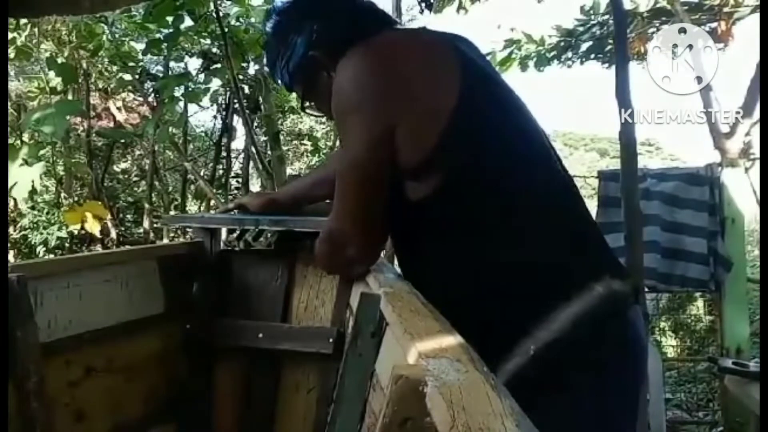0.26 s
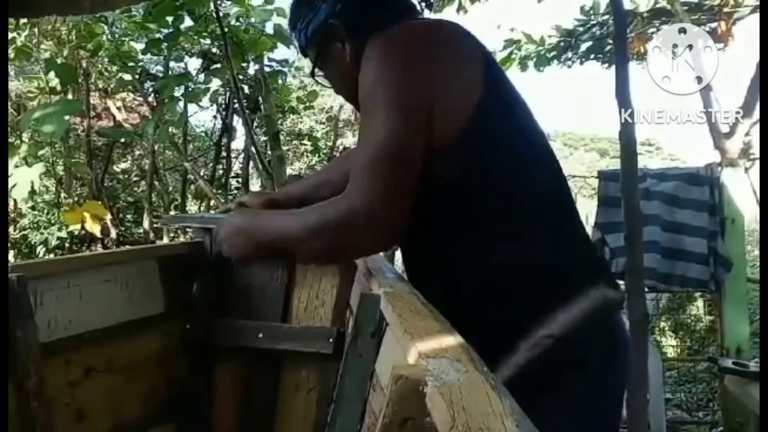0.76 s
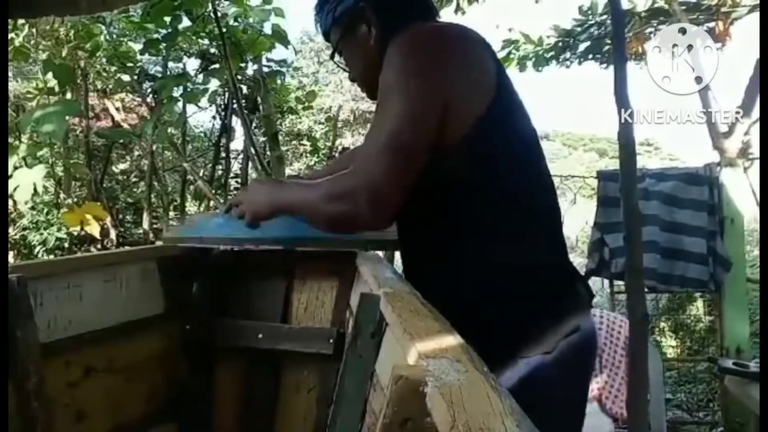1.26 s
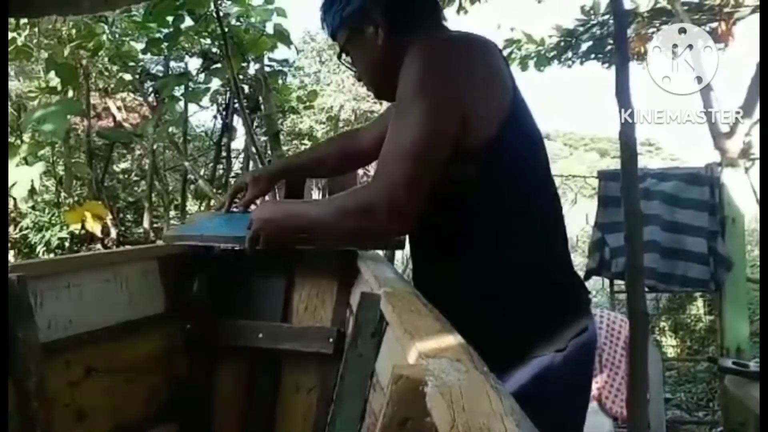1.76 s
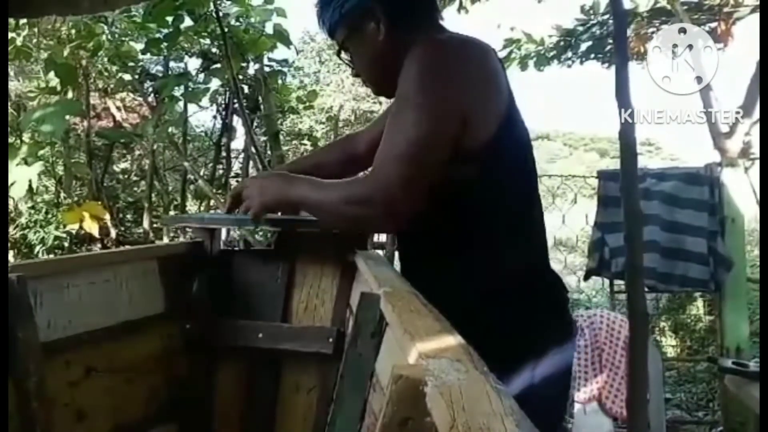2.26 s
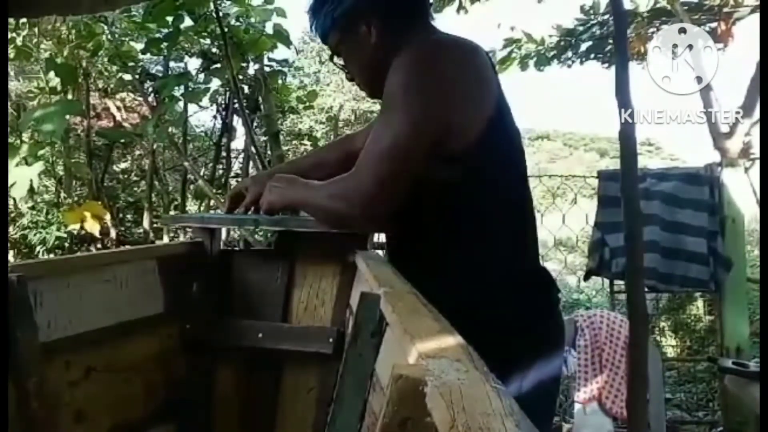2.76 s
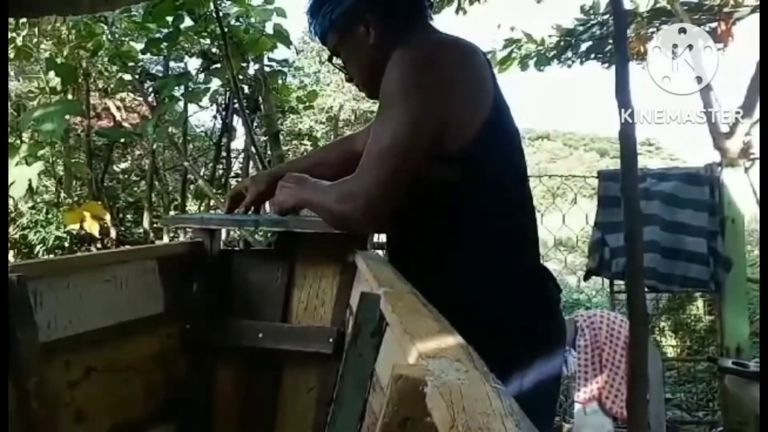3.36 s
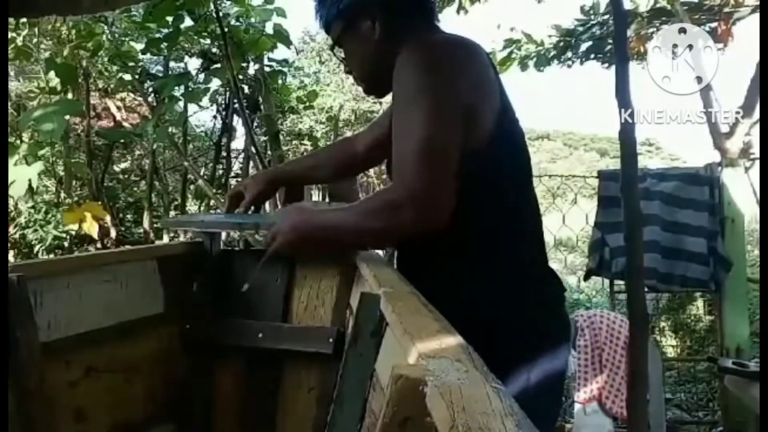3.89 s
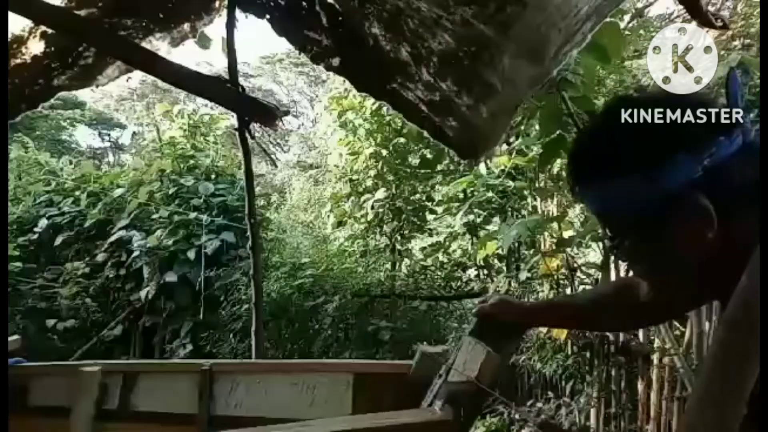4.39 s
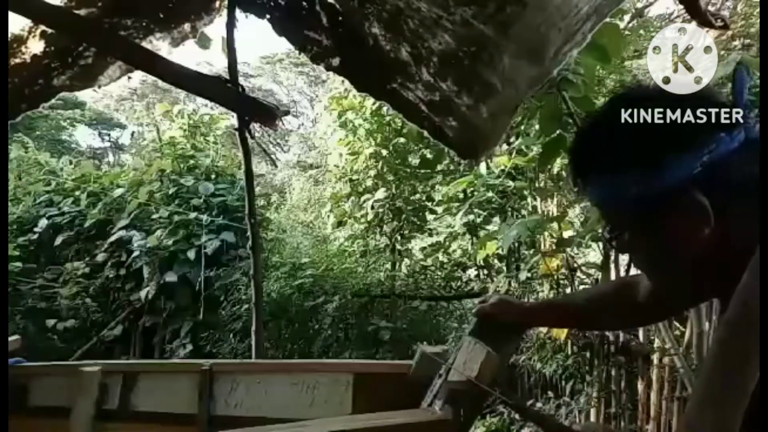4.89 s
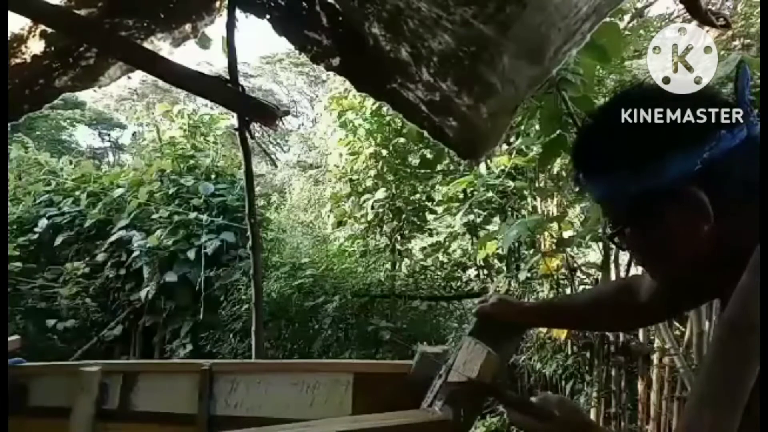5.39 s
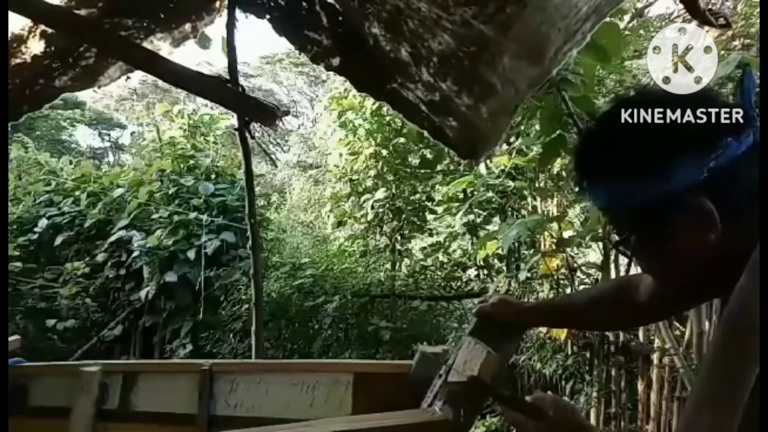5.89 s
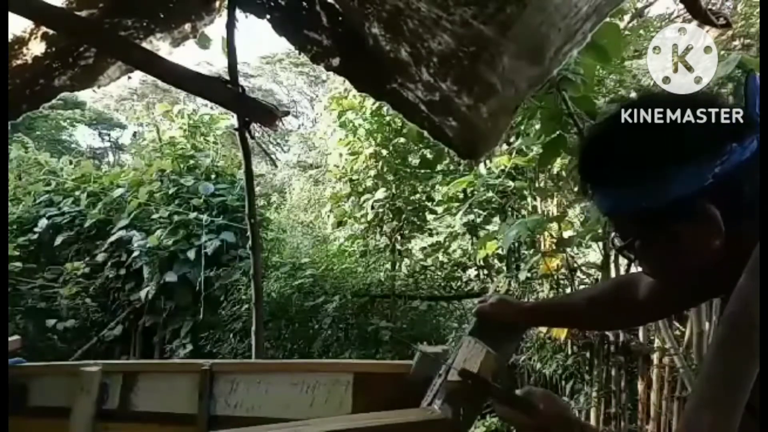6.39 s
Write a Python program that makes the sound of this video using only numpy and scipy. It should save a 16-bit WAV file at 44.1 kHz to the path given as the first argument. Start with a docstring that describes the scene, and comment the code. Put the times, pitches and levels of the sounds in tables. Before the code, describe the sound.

Close, centred handling of wood and steel under an open garden shelter: bright quick rattles, short scrapes, a loud low thump with a small rebound, then uneven knocks ending in two sharper ones. Thin shrill insects, whistling and hoarse birds and a distant rooster surround it. The sound cuts out briefly, then raspy rhythmic hand-sawing runs to the end over fainter insects, the plank shuddering and knocking.

```python
"""A hand saw cuts a plank under a garden shelter: hard push strokes, softer and longer pull strokes.
Each saw tooth bites the kerf as a noise impulse that rings the plank and blade; torn fibres add hiss.
Before a short silence, saw and plank are shifted on a wooden frame: drags, and blows that ring dying modes.
One heavy thump makes the gain control duck. Behind it, insects buzz as bands of noise and a pulsed tone,
birds and a far rooster call in gliding tones, and the open air is a faint wash with a low rumble."""
import sys
import numpy as np
from scipy import signal
from scipy.fft import rfft, irfft, next_fast_len
from scipy.io import wavfile
from scipy.ndimage import uniform_filter1d

SR = 44100
rng = np.random.default_rng(int(sys.argv[2]) if len(sys.argv) > 2 else 0)


def transcribe(u):
    """Save the signal u as a 16-bit wav file named by the first command-line argument.

    u: samples, shape (n,) or (channels, n), limited to [-1, 1]; the rate is SR.
    q: integer samples, one column per channel.
    """
    v = np.clip(np.atleast_2d(u).T, -1, 1)
    q = np.round(v * 32767).astype(np.int16)
    wavfile.write(sys.argv[1], SR, q)


N = 293265
TIME = np.arange(N) / SR  # seconds


def amp(db):
    """Decibels to gain."""
    return 10 ** (np.asarray(db) / 20)


def unit(x):
    """Scales to rms 1."""
    return x / np.sqrt(np.mean(x ** 2) + 1e-20)


def add(mix, start, sound):
    """Mixes a sound in, in place, at start seconds."""
    part = mix[max(round(start * SR), 0):][:len(sound)]
    part += sound[:len(part)]


def progress(length):
    """Runs from 0 to 1 in length seconds."""
    return np.linspace(0, 1, round(length * SR))


def arch(u, crest):
    """Rises from 0 to 1 at the share crest of u, and falls back."""
    crest = np.clip(crest, .05, .95)
    return np.sin(np.pi * np.interp(u, [0, crest, 1], [0, .5, 1]))


def gate(start, stop, rise_s, fall_s):
    """Attack, hold and release over the whole scene, 0-1."""
    return np.clip(np.minimum((TIME - start) / rise_s, (stop - TIME) / fall_s), 0, 1)


def wander(size, hz):
    """Smooth random drift of rms 1 that heads for a new value hz times a second."""
    knots = rng.standard_normal(4096)
    return unit(np.interp(np.arange(size) * hz / SR, np.arange(len(knots)), knots))


def colour(x, points):
    """Filters by a spectrum of (Hz, dB) points that falls 60 dB an octave beyond its ends; rms 1."""
    hz, db = np.transpose(points)
    size = next_fast_len(len(x) + 1024)
    octave = np.log2(np.fft.rfftfreq(size, 1 / SR) + 1)
    beyond = abs(octave - np.clip(octave, np.log2(hz[0]), np.log2(hz[-1])))
    gain = amp(np.interp(octave, np.log2(hz), db) - 60 * beyond)
    return unit(irfft(rfft(x, size) * gain, size)[:len(x)])


def resonate(x, hz, width):
    """A band-pass resonance of gain 1 at its centre, width in Hz."""
    return signal.lfilter(*signal.iirpeak(hz, hz / width, fs=SR), x)


def echoes(x, t60, wet_db):
    """Adds a diffuse tail of reflections that starts after 4 ms and falls 60 dB in t60 seconds."""
    t = TIME[:SR // 2]
    tail = rng.standard_normal(len(t)) * amp(-60 * t / t60) * (t > .004)
    tail /= np.linalg.norm(tail)
    return x + amp(wet_db) * signal.fftconvolve(x, tail)[:len(x)]


# The still garden air. Each row: a point of its spectrum, frequency in Hz, relative level in dB.
AIR_SPECTRUM = [(25, -20.5), (60, 0), (100, 0), (145, -6), (250, -11.5), (400, -16), (760, -15.5),
                (1300, -24.5), (2100, -27), (3200, -27), (6300, -32.5), (11000, -38), (13000, -51)]


def air():
    """Faint outdoor wash of coloured noise, with a low, distant rumble of noise in a narrow band."""
    wash, rumble = rng.standard_normal((2, N))
    wash = colour(wash, AIR_SPECTRUM) * amp(0.41 * wander(N, 4.1))
    rumble = resonate(resonate(rumble, 95.7, 27), 95.7, 27)
    return amp(-43.0) * wash + amp(-42.5) * unit(rumble)


# The short silence. One row: fade begins, silent from, sound returns, length of the fade-in, all in seconds.
SILENCE = (4.072, 4.12, 4.184, .008)
# The far chorus, one kind a row. Each row: centre in Hz, width in Hz, level in dB, mean chirps a second,
# chirp depth 0-1, start of its swell in seconds (below zero: already singing at the opening).
FAR_CHORUS = [(7865, 780, -41, 57, 0.08, -1), (8950, 700, -52, 17, 0.3, -3), (9380, 720, -42.5, 12, 0, -1),
              (9820, 2200, -47, 15, 0.1, -2.5), (10900, 520, -60, 7, .1, -10.5)]
# Bouts of the nearest insect. Each row: start in seconds, stop in seconds, level in dB.
NEAR_BOUTS = [(-1, .07, -44), (.3, 2.07, -45.5), (2.65, 4.0, -45), (4.1, 7, -53)]
SWELL_S, STOP_S = 0.54, 0.028  # a bout swells slowly and stops short
CHORUS_DROP_DB = -7  # the far chorus is fainter after the silence


def far_insects():
    """Each far kind shrills as noise in its own band, pulsed by its chirps; the whole chorus wavers."""
    chorus = np.zeros(N)
    for hz, width, db, rate, depth, start in FAR_CHORUS:
        edges = [hz - width / 2, hz + width / 2]
        band = signal.butter(3, edges, "band", fs=SR, output="sos")
        turns = np.cumsum(rate * (1 + .2 * wander(N, 2.2))) / SR
        chirps = 1 + depth * np.sin(2 * np.pi * turns)
        shrill = unit(chirps * signal.sosfilt(band, rng.standard_normal(N)))
        chorus += amp(db) * np.clip((TIME - start) / SWELL_S, 0, 1) * shrill
    return chorus * amp(CHORUS_DROP_DB * (TIME > SILENCE[1]) + 2.0 * wander(N, 15))


def near_insect():
    """The nearest insect buzzes in bouts: a thin, unsteady tone, pulsed 114 times a second."""
    buzz = 1 + .6 * np.sin(2 * np.pi * 114 * TIME)
    tone = np.sin(2 * np.pi * np.cumsum(11180 + 70 * wander(N, 500)) / SR)
    bouts = sum(amp(db) * gate(start, stop, SWELL_S, STOP_S) for start, stop, db in NEAR_BOUTS)
    return bouts * unit(echoes(buzz * tone, t60=.15, wet_db=-11))


def call(hz, loudness, rough, partials_db):
    """A gliding harmonic tone; fast random flutter of its pitch makes it hoarse."""
    turns = np.cumsum(hz * (1 + rough * wander(len(hz), 900))) / SR
    partials = [amp(db) * np.sin(2 * np.pi * k * turns) for k, db in enumerate(partials_db, 1)]
    return loudness * unit(sum(partials))


# Falling whistles. Each row: start in seconds, length in seconds, first Hz, last Hz, relative level in dB.
WHISTLE_CALLS = [(0, 0.15, 4720, 4420, -42.5), (0.263, .36, 4150, 3630, -44), (0.721, .6, 4100, 2790, -48),
                 (3.334, 0.15, 3880, 3770, -55), (3.69, 0.1, 3050, 2840, -51.5)]
SETTLE, WHISTLE_CREST = 1.8, 0.53  # how quickly the fall levels off; share of the length at its loudest


def whistles(out):
    """Adds nearly pure tones whose fall in pitch levels off."""
    for start, length, first_hz, last_hz, db in WHISTLE_CALLS:
        u = progress(length)
        hz = first_hz + (last_hz - first_hz) * np.expm1(-SETTLE * u) / np.expm1(-SETTLE)
        add(out, start, call(hz, amp(db) * arch(u, WHISTLE_CREST), rough=0.022, partials_db=[0]))


# Hoarse chirps. Each row: start in seconds, length in seconds, top Hz before the trill, relative level in dB,
# share of the length at which it is loudest.
CHIRP_CALLS = [(0.44, 0.063, 2720, -35.5, .4), (1.58, 0.075, 2420, -34, 0.34),
               (2.155, 0.076, 3000, -37.5, 0.69), (2.349, 0.1, 3150, -33.5, 0.93)]
CHIRP_TURN, CHIRP_FALL = .22, .26  # share of the length at the top pitch; share of pitch lost per length
TRILL_HZ, TRILL_DEPTH = 270, .07  # depth as a share of the pitch


def chirps(out):
    """Adds tones that rise and fall in pitch under a fast trill."""
    for start, length, top_hz, db, crest in CHIRP_CALLS:
        u = progress(length)
        trill = 1 + TRILL_DEPTH * np.sin(2 * np.pi * TRILL_HZ * length * u)
        hz = top_hz * (1 - CHIRP_FALL * abs(u - CHIRP_TURN)) * trill
        add(out, start, call(hz, amp(db) * arch(u, crest), rough=0.05, partials_db=[0, -25]))


def rooster(out):
    """Adds one far crow: its pitch starts low, scoops up quickly, then sags."""
    start_s, length_s, crest = 2.9, .46, .22
    full_hz, level_db = 717, -43
    scoop, scoop_s, sag = .28, .02, 0.17  # shares of the pitch, and the time of the scoop
    u = progress(length_s)
    hz = full_hz * (1 - scoop * np.exp(-u * length_s / scoop_s) - sag * u)
    add(out, start_s, call(hz, amp(level_db) * arch(u, crest), rough=0.062, partials_db=[-3, 0, -3]))


def birds():
    """Birds in the bushes; leaves scatter the calls and make them fade in and out."""
    calls = np.zeros(N)
    whistles(calls)
    chirps(calls)
    rooster(calls)
    return amp(-3.0) * echoes(calls * amp(1.6 * wander(N, 45)), t60=.22, wet_db=-9)


# Light drags of the saw over the wood. Each row: start in seconds, length in seconds, level in dB.
DRAGS = [(-.02, 0.3, -40), (0.382, 0.13, -44.5), (0.768, 0.086, -48), (0.885, 0.12, -40.5),
         (1.234, 0.15, -42.5)]


def slide():
    """Steel drags lightly over dry wood: coloured noise of uneven grit."""
    grit = rng.standard_normal(N) * amp(3.0 * wander(N, 150))
    drags = sum(amp(db) * gate(start, start + length, rise_s=0.014, fall_s=0.04)
                for start, length, db in DRAGS)
    return drags * colour(grit, [(250, 6.0), (700, -1.0), (1700, -2.5), (2400, -5.5), (4700, -8),
                                 (7000, -10), (12500, -11.5)])


def ring(modes, t):
    """Dying modes; each blow lands on a slightly different spot, so tuning, level and sign vary."""
    hz, db, t60 = np.transpose(modes)[:, :, None]
    detune, spot, side = rng.standard_normal((3, len(modes), 1))
    swing = np.sign(side) * np.sin(2 * np.pi * hz * (1 + 0.0092 * detune) * t)
    return (amp(db + spot - 60 * t / t60) * swing).sum(0) / np.linalg.norm(amp(db))


# Low modes of the wooden frame. Each row: frequency in Hz, relative level in dB, t60 in seconds.
FRAME_MODES = [(78.2, -15, 0.55), (92.1, -6.5, 0.6), (111.6, 1, 0.34), (127.3, 2.5, 0.34),
               (160, -3.5, 0.21), (242, 1, 0.17), (309.6, -5, 0.11), (376, -1.5, 0.069)]
# Diffuse shudder of the whole frame. Each row: frequency in Hz, relative level in dB.
FRAME_SHUDDER = [(75, 5), (125, 2.5), (200, -6), (420, -9.5), (520, -21)]
# Spectrum of a blow's dull clatter. Each row: frequency in Hz, relative level in dB.
CLATTER_SPECTRUM = [(30, -24), (200, 6), (600, 5.5), (1000, -1), (1800, -2.5), (2400, -13.5), (4500, -20.5),
                    (8000, -42)]
# Spectrum of a blow's click. Each row: frequency in Hz, relative level in dB.
CLICK_SPECTRUM = [(1000, -30), (2800, -2), (5000, -5), (7000, -8.5), (10000, 1.5), (13000, -10)]


def blows(rows, modes, ring_db, clatter_db, bright_hz, size):
    """A brief scuffing contact rings the struck thing and the frame beneath it."""
    out, t = np.zeros(N), TIME[:size]
    softness = signal.butter(4, min(bright_hz, SR / 3), fs=SR, output="sos")
    clatter_tail, click_tail = amp(-19 - 60 * t / .2), amp(-19 - 60 * t / .1)
    for start, db, boom_db, click_db, contact in rows:
        grain, steel, shudder = rng.standard_normal((3, size))
        rise = 1 - np.exp(-2 * t / contact)
        clatter = colour(grain, CLATTER_SPECTRUM) * (np.exp(-t / (contact + 0.0078)) + clatter_tail)
        click = unit(signal.sosfilt(softness, colour(steel, CLICK_SPECTRUM)))
        click *= np.exp(-t / contact) + click_tail
        boom = ring(FRAME_MODES, t) + colour(shudder, FRAME_SHUDDER) * amp(-8.5 - 60 * t / 0.29)
        body = amp(ring_db) * ring(modes, t) + amp(boom_db + 2.0) * boom + amp(clatter_db) * clatter
        add(out, start, amp(db) * (rise * body + amp(click_db - 6) * click))
    return out


# The saw rattles on the frame. Each row: start in seconds, level in dB, relative boom of the frame in dB,
# relative click in dB, contact time in seconds.
RATTLE_BLOWS = [(.002, -20.5, -14, -10, 0.035), (.049, -20.5, -25, 5, .002), (.075, -19, -13, 10, 0.0014),
                (.107, -20, -29, 0, 0.0028), (.119, -20.5, -25, 5, .003), (.158, -14, -22.5, 0, 0.0019),
                (.205, -25, -27, 0, 0.0058), (.232, -19, -22, -2, 0.0034), (.370, -26, -11, -6, 0.0018),
                (.489, -24, -12.5, -20, 0.0029)]
# Modes of the rattling saw. Each row: frequency in Hz, relative level in dB, t60 in seconds.
SAW_MODES = [(280, -8.5, 0.085), (322, 2, 0.16), (392, 0, 0.079), (485, 6.5, 0.059), (585, 6, 0.086),
             (678, 0.5, 0.14), (791, -2, 0.12), (1196, -6.5, 0.12), (1314, -3, 0.042), (1530, 1, 0.064),
             (1684, 2, 0.081), (2720, -6.5, 0.042)]


def rattle():
    """Quick bright blows of the saw on the frame."""
    return blows(RATTLE_BLOWS, SAW_MODES, ring_db=4.0, clatter_db=-3.0, bright_hz=12000, size=SR // 6)


# The plank knocks as it is shifted. Each row: start in seconds, level in dB, relative boom of the frame in dB,
# relative click in dB, contact time in seconds.
PLANK_KNOCKS = [(1.81, -33.5, 8, -13, 0.031), (2.085, -34, 18, -9, 0.0093), (2.154, -25.5, -14, -10, 0.022),
                (2.484, -35.5, -15, 5.5, 0.011), (2.658, -29.5, -12, -5, 0.0044),
                (3.084, -24.5, -9, -9, .012), (3.113, -23, 2, -6, 0.0091), (3.134, -16, -6.5, -2, 0.0024),
                (3.185, -26.5, 0, -8, 0.013), (3.328, -30.5, 1, -19, 0.015), (3.43, -24.5, -3, -9, 0.0087),
                (3.453, -8.5, -12, 1, 0.0041), (3.483, -22, -17, 0.5, 0.021),
                (3.497, -11.5, -9, 1.5, 0.0028)]
# Modes of the shifted plank. Each row: frequency in Hz, relative level in dB, t60 in seconds.
SHIFTED_MODES = [(126.3, -7.5, 0.078), (249, -2.5, 0.17), (321, -5.5, 0.19), (473, -11, 0.16),
                 (662, 5.5, 0.084), (646, -24.5, 0.1), (1230, -2.5, 0.053), (1660, -6, 0.069),
                 (1820, -13.5, 0.15), (2357, -14.5, .1), (2980, -7.5, 0.042), (3450, -18, 0.071)]


def plank_knocks():
    """The shifted plank rings as it knocks on the frame."""
    return blows(PLANK_KNOCKS, SHIFTED_MODES, ring_db=4.0, clatter_db=-5.0, bright_hz=10800, size=SR // 5)


# The heavy thump and its rebound. Each row: start in seconds, level in dB, relative boom of the frame in dB,
# relative click in dB, contact time in seconds.
THUMP_BLOWS = [(1.337, 4.5, 5.5, -5, 0.0039), (1.384, -15, 1.5, -8.5, 0.0026)]
# Modes of the thumped board. Each row: frequency in Hz, relative level in dB, t60 in seconds.
BOARD_MODES = [(403, -14.5, 0.097), (443, 4.5, 0.098), (632, -4.5, .09), (715, 3.5, 0.1),
               (836, -2.5, 0.069), (908, -4, 0.099), (1337, -17, 0.1)]


def thump():
    """A heavy, dull blow and its weaker rebound ring the board over a booming frame."""
    return blows(THUMP_BLOWS, BOARD_MODES, ring_db=1.5, clatter_db=-6.5, bright_hz=4400, size=SR // 2)


# The saw jolts the plank when it binds or turns round. Each row: start in seconds, level in dB,
# relative boom of the frame in dB, relative click in dB, contact time in seconds.
SAW_JOLTS = [(4.19, -33.5, 6, -15, 0.019), (4.248, -32, -2, -1, 0.0058), (4.376, -20, 6, -16, 0.0088),
             (4.452, -7.5, -15, 0.5, 0.018), (4.806, -24, -4.5, 1, 0.0038), (4.855, -17.5, -14, -3, .012),
             (5.283, -11.5, -14, -9, 0.0012), (5.305, 0.5, -8.5, -2, 0.0014), (5.679, -33, -17, 10, .002),
             (5.826, -7, -12, -14.5, 0.014), (5.917, -26, -1, 3, 0.003), (5.972, -20.5, -0.5, -11, 0.0036),
             (6.474, -23, -4, 1, 0.0036)]
# Modes of the jolted plank. Each row: frequency in Hz, relative level in dB, t60 in seconds.
JOLTED_MODES = [(271, 0, 0.084), (399, -2.5, 0.088), (460.5, 2, 0.1), (512, -4, 0.082), (873, -7, 0.031),
                (1130, -15, 0.051)]


def jolts():
    """The plank under the saw rings briefly at each jolt."""
    return blows(SAW_JOLTS, JOLTED_MODES, ring_db=8.0, clatter_db=0.0, bright_hz=8000, size=SR // 7)


# How loudness follows the arm, first row the pull, second the push. Each row: power of speed in the rasp,
# in the shudder, in the hiss, growth of the shudder over the stroke in dB.
ARM_POWERS = [(1.7, 1, 1.2, 3.5), (2.26, 1, 2.65, 7.5)]
# Resonances of the plank under the saw. Each row: frequency in Hz, width in Hz,
# relative level on the pull in dB, on the push in dB.
PLANK_RESONANCES = [(89, 29, -3.5, -4), (131.6, 32, -0.5, 0), (183.3, 22, 9.5, 2), (235, 54, -3, 0.5),
                    (307, 71, -1.5, 1.5), (422, 50, -1, 3), (484.4, 49, 0, -1), (567, 49, -3, -6),
                    (738, 63, -19, -6.5)]
# Resonances that stand out of the rasp. Each row: frequency in Hz, width in Hz, relative level in dB.
RASP_RINGS = [(1014, 65, -2), (1277, 45, -10), (1515, 97, -4), (1760, 26, -8), (2730, 150, -4),
              (2760, 19, -15), (3300, 8.8, -16)]
# Colour of the cut on the pull. Each row: frequency in Hz, relative level in dB.
PULL_COLOUR = [(620, 2.5), (800, -6.5), (980, 4), (1120, -1), (1600, 3), (2200, 1.5), (3400, -10),
               (5000, -10.5), (6500, -19.5), (7500, -17.5)]
# Colour of the cut on the push. Each row: frequency in Hz, relative level in dB.
PUSH_COLOUR = [(620, -10.5), (800, 2.5), (1000, 7.5), (1200, 1.5), (1700, 1.5), (2200, 2.5), (2800, 2.5),
               (3500, -3), (5200, -9.5), (7500, -16)]
# Colour of the blade's hiss. Each row: frequency in Hz, relative level in dB.
HISS_COLOUR = [(3240, -6.5), (5500, -6), (7240, -9.5), (9780, 1.5), (11500, -9), (12500, -10.5),
               (13200, -15.5)]
TURN_SPEED = .2  # share of full speed left as the arm reverses


def stroke(row, push, tooth_hz):
    """Teeth strike the kerf at a rate set by blade speed, tearing fibres; loudness follows speed and pressure."""
    start, length, rasp_db, plank_db, hiss_db, lean_db, evenness = row
    rasp_power, plank_power, hiss_power, growth_db = ARM_POWERS[push]
    u = progress(length)
    t = u * length
    # the arm slows at each reversal
    swing = np.tanh(evenness * np.sin(np.pi * u)) / np.tanh(evenness)
    speed = TURN_SPEED + (1 - TURN_SPEED) * swing
    pressure = amp(lean_db * (u - .5) + 1.0 * wander(len(t), 38.8))

    teeth = np.cumsum(tooth_hz * speed * (1 + .09 * wander(len(t), 200))) / SR  # running count of teeth
    depth, fibres, splinters = rng.standard_normal((3, len(t)))
    strikes = np.diff(np.floor(teeth), prepend=0) > 0
    bites = unit(strikes * amp(4.0 * depth))
    # tearing is strongest just after each tooth bites
    tearing = (1.1 + np.exp(-(teeth % 1) / 0.45)) * amp(1.3 * wander(len(t), 178.9))
    force = echoes(bites + unit(fibres * tearing), t60=0.047, wet_db=-4.0)

    plank = np.zeros(len(t))
    for k, (hz, width, *level_db) in enumerate(PLANK_RESONANCES):
        plank += (-1) ** k * resonate(force, hz, width) * amp(level_db[push])
    plank = colour(plank, [(85, 0), (750, 0)])

    # the free length of the blade changes as it slides: random drift makes broad resonances come and go
    flexing = np.zeros(len(t))
    for hz in np.geomspace(600, 7500, num=24):
        flexing += resonate(force, hz, hz / 8) * amp(3.0 * wander(len(t), 34.4))
    rings = sum(amp(db) * resonate(flexing, hz, width) for hz, width, db in RASP_RINGS)
    rasp = colour(flexing + rings, PUSH_COLOUR if push else PULL_COLOUR)
    hiss = colour(unit(splinters * tearing) + .5 * force, HISS_COLOUR)

    cut = amp(rasp_db) * speed ** rasp_power * rasp
    cut += amp(hiss_db) * speed ** hiss_power * hiss
    cut += amp(plank_db + growth_db * (u - .5)) * speed ** plank_power * plank
    fade = np.clip(np.minimum(t, length - t) / 0.0081, 0, 1) ** .5
    return start, fade * pressure * cut


# Saw strokes, pull and push in turn. Each row: start in seconds, length in seconds, relative level in dB of
# the rasp of the teeth, of the shudder of the plank, of the hiss of the blade, gain in pressure from start
# to end in dB, evenness of the arm's speed.
SAW_STROKES = [(4.268, 0.3, -17, -12.3, -19.5, 0.5, .8), (4.555, 0.24, -14.5, -15.5, -14.5, -1, 0.56),
               (4.822, .3, -21.5, -21, -23, 3, 1.38), (5.126, .232, -16.5, -16.5, -15.5, -5.5, .85),
               (5.375, 0.29, -22, -18.5, -25, 1, 1.53), (5.672, .23, -18, -18, -16, -4, .6),
               (5.93, .32, -21.5, -20.5, -25, 3, 1.64), (6.24, 0.22, -16, -16.5, -16, -0.5, 0.61),
               (6.487, 0.33, -24.5, -20.5, -25, 0, 1.59)]


def saw():
    """Pull and push strokes take turns; the push is the faster. The shelter throws a little back."""
    out = np.zeros(N)
    for k, row in enumerate(SAW_STROKES):
        push = k % 2
        add(out, *stroke(row, push, tooth_hz=620 if push else 430))  # teeth a second near full speed
    return amp(2.5) * echoes(out, t60=0.38, wet_db=-16.5)


def scene():
    """Garden, blows and saw sound from the centre, the same in both channels."""
    garden = air() + far_insects() + near_insect() + birds()
    handling = slide() + rattle() + plank_knocks() + thump() + jolts()
    mid = garden + handling + saw()
    return np.array([mid, mid])


def pause():
    """Gain that fades to a short silence and snaps back."""
    fade, silent, back, rise = SILENCE
    fade_out = np.clip((silent - TIME) / (silent - fade), 0, 1) ** 2
    return fade_out + np.clip((TIME - back) / rise, 0, 1) ** 2


def record(dry):
    """Gain control drops fast and creeps back; low cut; peaks clip; a short silence; the treble limit."""
    threshold_db, recovery_s, attack_s = -4.5, 1.94, 0.0014
    volume_db, edge_hz = -2.5, 13150
    power_db = 10 * np.log10(abs(uniform_filter1d((dry ** 2).mean(0), size=600)) + 1e-12)
    # the cut in dB holds to the largest excess so far, dying away exponentially
    release = np.exp(-TIME / recovery_s)
    held_db = np.maximum.accumulate(np.maximum(power_db - threshold_db, 0) / release) * release
    pole = np.exp(-1 / (attack_s * SR))
    ducked = dry * amp(-signal.lfilter([1 - pole], [1, -pole], held_db))
    thinned = signal.sosfilt(signal.butter(1, 45, "high", fs=SR, output="sos"), ducked)
    out = np.clip(amp(volume_db) * thinned, -.95, .95) * pause()
    treble_limit = signal.firwin(401, edge_hz, window=("kaiser", 8), fs=SR)
    return signal.oaconvolve(out, treble_limit[None], "same")


dry = scene()
out = record(dry)
transcribe(out)
```